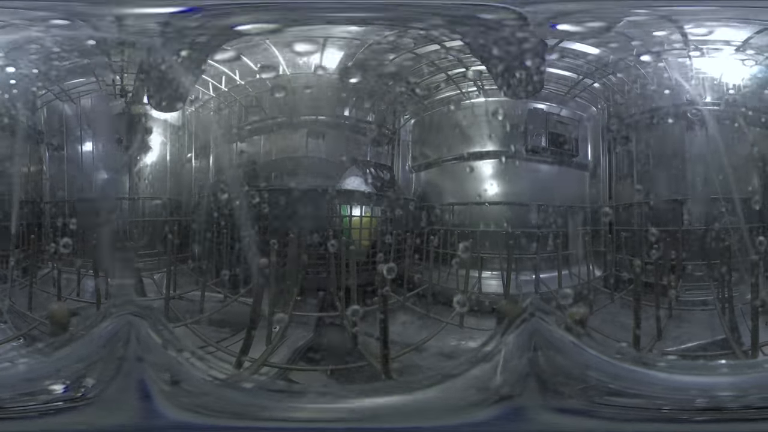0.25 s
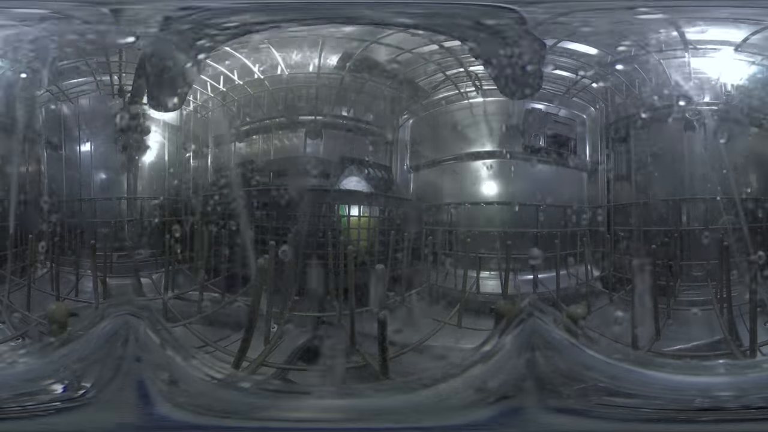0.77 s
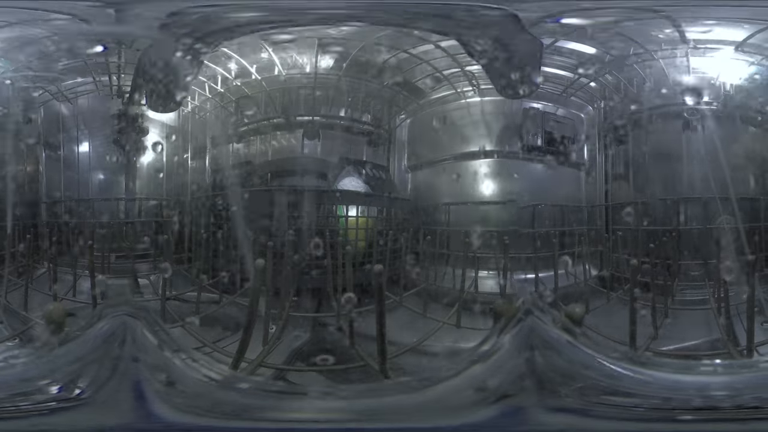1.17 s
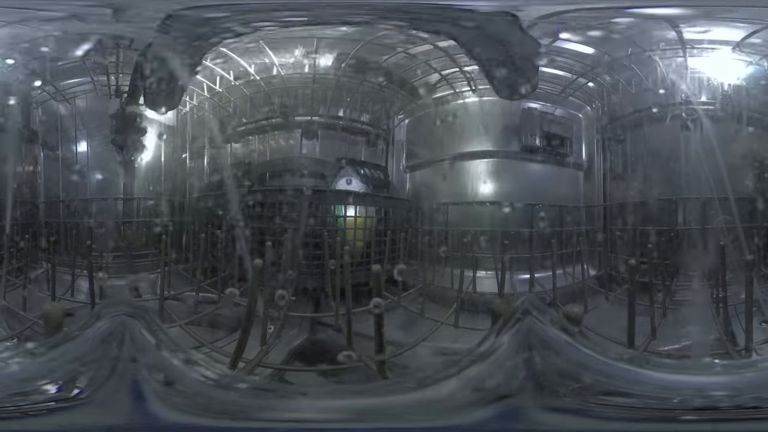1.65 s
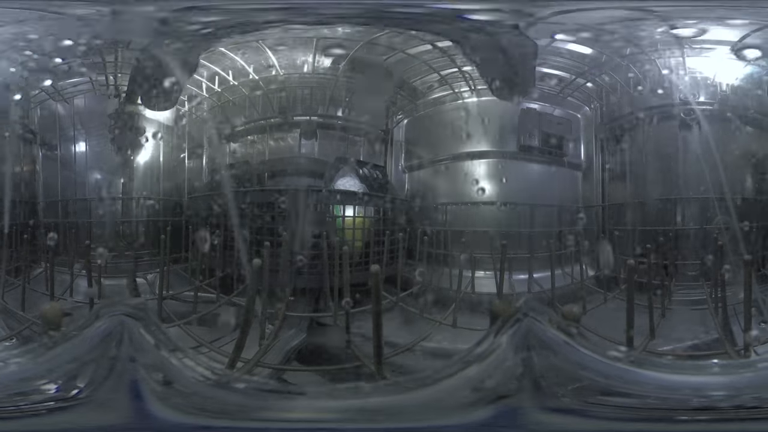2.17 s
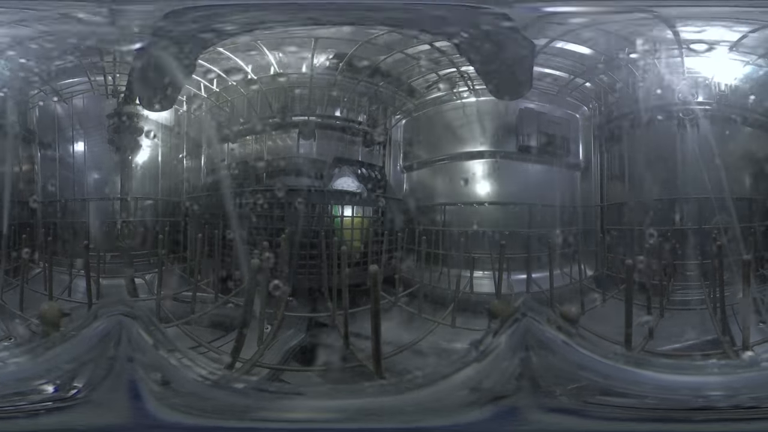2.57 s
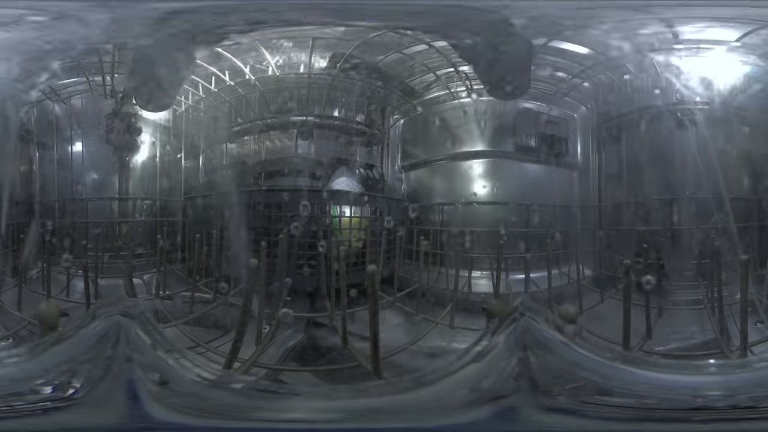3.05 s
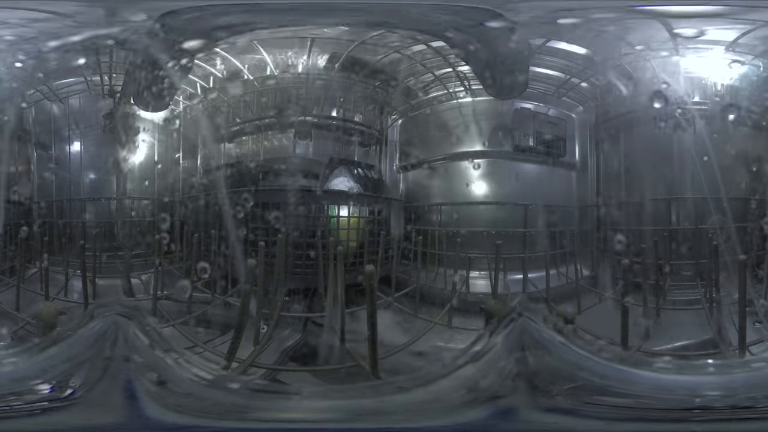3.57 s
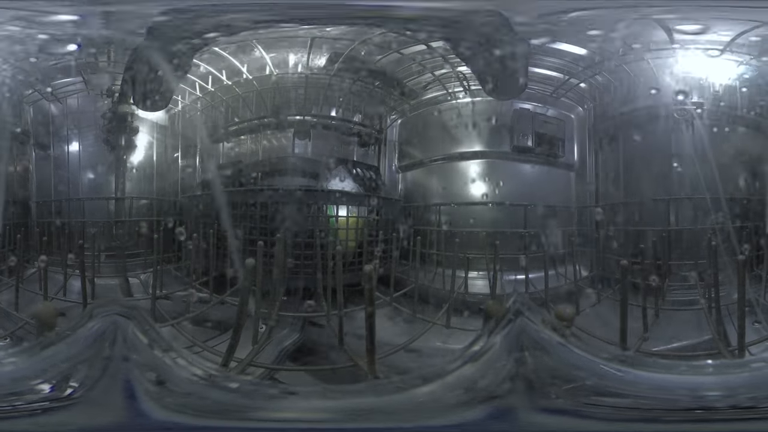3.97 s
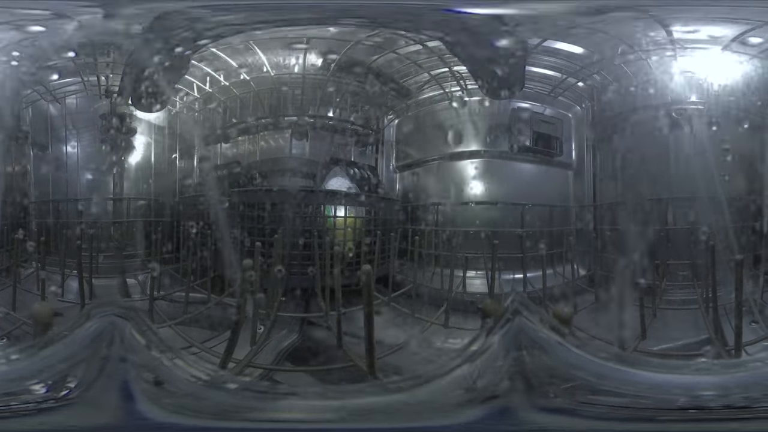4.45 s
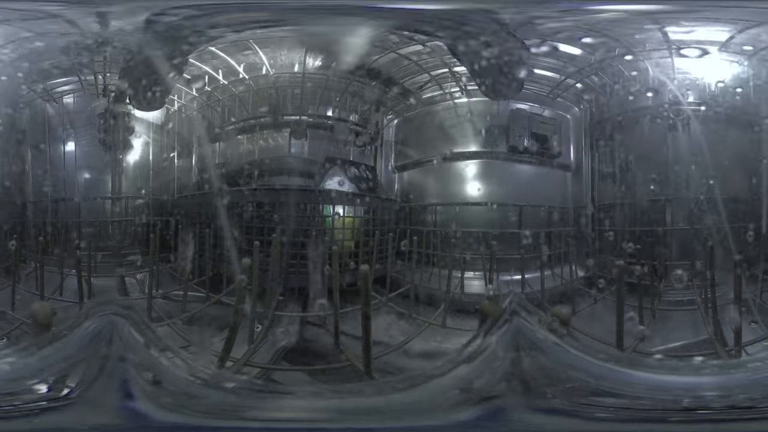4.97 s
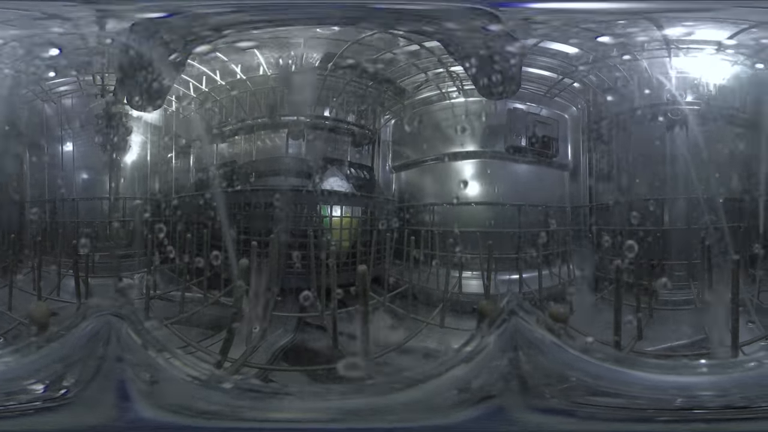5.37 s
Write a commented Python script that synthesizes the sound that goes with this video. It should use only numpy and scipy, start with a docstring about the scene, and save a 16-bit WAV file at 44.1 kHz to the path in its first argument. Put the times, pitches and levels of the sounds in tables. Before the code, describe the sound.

Water jets drum steadily on the steel tub and wire racks of a running dishwasher, heard from inside. The hollow wash comes in quick spurts, with slaps on the walls and brief ringing from the wires. Fine spray hisses and patters on the microphone's waterproof housing, and bigger drops strike it with sharp ticks, loudest about halfway and near the end. A pump hums faintly underneath.

```python
"""Water jets drumming on the steel tub and racks, heard from inside a running dishwasher.
Two spray arms sweep round: slugs of water slap the walls, rack wires sing, gushes break close by.
A fine spray patters on the microphone's waterproof housing, and now and then a big drop strikes it
with a sharp tick, the hardest ones clipping. A grainy mist hisses all around; the pump hums underneath."""
import sys
import numpy as np
from scipy import signal
from scipy.fft import rfft, irfft, next_fast_len
from scipy.io import wavfile

SR = 44100
rng = np.random.default_rng(int(sys.argv[2]) if len(sys.argv) > 2 else 0)


def transcribe(signal):
    """Save signal, clipped to [-1, 1], as a 16-bit WAV file at the path in sys.argv[1]."""
    frames = np.atleast_2d(signal).T
    limited = np.clip(frames, -1, 1)
    pcm = np.round(limited * 32767).astype(np.int16)
    wavfile.write(sys.argv[1], SR, pcm)


N = 247401
TIME = np.arange(N) / SR
FREQS = np.maximum(np.fft.rfftfreq(next_fast_len(N), 1 / SR), 1)
SIDES = np.array([[.5], [-.5]])   # half of a left-right difference goes to each ear
LOWER_TURN_S, CUTOFF_HZ = 1.153, 15900

# Resonances of tub, racks and trapped air. Each row: pitch in Hz, width in Hz, level in dB,
# left over right in dB, left phase lead in radians.
TUB_MODES = [(58, 41, -62, 4, 0.5), (245, 132, -46, -7.5, 2), (392.5, 57, -51, -6, 2.0),
             (481, 97, -42, -7.5, 2.5), (560.7, 32, -41.5, -6, 3.5), (584, 154, -35.5, -5, 3.0),
             (678, 230, -29, -5, 3.0), (823, 220, -27, -5.5, -3), (898.5, 31, -34.5, -7.5, -2.5),
             (990, 73, -37.5, -7, -1.5), (1065.5, 94, -33.5, -13, -2), (1110, 53, -32.5, -11, -1.33),
             (1179.3, 38, -40, -12.5, -0.8), (1265.5, 49, -42.5, -7.5, -0.5), (1276, 20.5, -43, -12.5, -2),
             (1313, 10.4, -46, -19.5, -3), (1433, 61, -46, -8.5, -1.5), (1523, 26, -49.5, -8, 2.5),
             (1564, 53, -51.5, -12.5, 2), (1671, 56, -48, -9, 1.5), (1812, 80, -48, 14, -2.6),
             (1939, 70, -40.5, 3.5, -2), (2026, 33, -43, 0.5, -3), (2467, 72, -45, -8, 1.05),
             (2677, 26, -47, 1, 0.8), (2716, 25, -41.5, -9, -1.5), (2743, 710, -39.5, -9, 0.16),
             (3140, 150, -49.5, -9, 1), (4084, 78, -38.5, -4.5, 3.5), (4373, 36, -41, 5, -1.5)]
# Force of the jets on the walls. Each row: time in seconds, relative level in dB.
JET_FORCE = [(0.0, -23.5), (0.15, -28.5), (0.53, -26), (0.76, -28.5), (1.06, -24.5), (1.26, -28.5),
             (1.32, -28), (1.42, -31), (1.48, -25.5), (1.64, -31), (1.84, -28), (2.01, -25), (2.11, -28),
             (2.3, -27.5), (2.39, -33.5), (2.47, -27.5), (2.58, -28.5), (2.69, -24), (2.87, -30.5),
             (3.04, -27.5), (3.15, -27), (3.43, -25.5), (3.55, -29.5), (3.72, -26), (4.0, -30), (4.08, -24),
             (4.22, -28.5), (4.38, -25.5), (4.5, -25.5), (4.62, -22.5), (4.75, -26.5), (4.86, -30.5),
             (5.15, -27), (5.38, -28.5), (5.6, -22.5)]
# Slugs of water slapping a wall. Each row: start in seconds, strength in dB.
WALL_SLAPS = [(0.049, 30), (0.09, 34), (0.225, 31), (0.305, 31), (0.689, 29), (1.042, 34.5), (1.248, 33),
              (1.483, 34), (1.595, 35), (1.767, 35.5), (1.913, 32.5), (2.0, 24), (2.78, 33.5), (3.265, 29),
              (3.336, 38), (3.777, 27), (3.876, 27), (4.362, 32), (4.396, 34), (4.438, 28), (4.524, 33),
              (4.594, 34.5), (4.663, 32), (5.081, 33), (5.485, 30), (5.516, 23)]
# The upper arm's jets crossing rack wires. Each row: peak time in seconds, level in dB, pitch in Hz.
WIRE_CROSSINGS = [(0.26, -30, 2730), (0.838, -26, 2695), (1.422, -21.5, 2730), (1.577, -28, 2730),
                  (1.716, -31, 2690), (1.753, -28, 2680), (2.467, -28.5, 2740), (2.736, -35, 2710),
                  (3.079, -26, 2720), (3.146, -24, 2714), (3.354, -32, 2700), (3.957, -29, 2740),
                  (4.053, -28.5, 2725), (4.631, -24, 2725), (4.962, -25.5, 2705), (5.215, -24.5, 2730),
                  (5.291, -28, 2750), (5.325, -30, 2750), (5.557, -29, 2730)]
# Gushes breaking on the racks. Each row: start in seconds, level in dB, centre in Hz, swell in seconds.
RACK_GUSHES = [(0.125, -40, 3200, 0.012), (1.597, -30, 3400, 0.0041), (1.755, -37, 2000, 0.0088),
               (2.552, -30, 3400, 0.0083), (3.23, -19, 4070, 0.0024), (4.505, -27.5, 1830, 0.0091)]
# Resonances of the housing. Each row: pitch in Hz, width in Hz, level in dB, left over right in dB,
# left phase lead in radians.
HOUSING_MODES = [(3690, 430, -38, -0.5, 4), (4440, 790, -37.5, -6.5, -0.7), (4903, 360, -32.5, -1, 0.41),
                 (5840, 1300, -55.5, 12, -7), (7275, 170, -43.5, -7, 1.6), (8420, 460, -47.5, -13, 3.5),
                 (9340, 300, -50, 11, -1), (11470, 900, -46, -9, 1.5), (13350, 820, -46, 15, 4),
                 (15700, 660, -46, 4, 5)]
# Spray reaching the housing. Each row: time in seconds, relative level in dB.
SPRAY_FORCE = [(0.0, -26), (1.58, -26.5), (1.83, -26.5), (2.06, -25.5), (3.77, -26.5), (3.95, -25),
               (4.14, -27.5), (4.36, -28), (4.55, -24.5), (5.47, -26), (5.61, -26.5)]
# Sheets of spray splattering over the housing. Each row: start in seconds, level in dB.
SPRAY_SHEETS = [(0.31, -42), (0.87, -33), (1.14, -26), (1.6, -25.5), (1.74, -28), (2.3, -25.5), (2.53, -31),
                (3.46, -25), (3.92, -30), (4.53, -33)]
# Big drops on the housing. Each row: start in seconds, ring level in dB, ring pitch in Hz,
# fizz against the ring in dB, splash level in dB, knock level in dB, left over right in dB.
BIG_DROPS = [(0.0921, -21, 14000, 4.5, -13.5, -23, -1), (0.2947, -25, 6720, 3, -26, -19, 0),
             (0.3585, -19.5, 7740, 8, -26, -26, 1), (0.7502, -22, 6740, 6, -16, -6, -3),
             (0.8812, -25, 6500, -4, -20, -20, 0), (0.9002, -8, 6750, 0, -13, -9, -6),
             (1.1895, -15, 14700, 9, -14, -12, 1.5), (1.2569, -14, 5500, 0, -24, -15, -5),
             (1.3349, -22, 7500, 3, -26, -30, -4), (1.4948, -18, 6900, -4, -27, -32, -13),
             (1.5962, -19, 2950, 0, -14, -8.5, 0), (1.6162, -28, 6900, 2, -14, -25, 0),
             (1.8776, -24, 9300, 7, -19, -26, 1), (2.5486, -24, 7010, 4, -19, -21, 0),
             (2.9934, 1.5, 5070, -2, -16, 0, -8), (3.4516, -23, 11800, 5, -23, -30, -2),
             (3.7967, -12, 15200, 3, -14.5, -15, 2), (3.9407, -31, 8000, 2, -22, -30, 0),
             (4.3295, -16, 12940, 6.5, -19, -27, -4), (4.4745, -25, 7500, 4, -24, -14, -2),
             (4.7107, -3.5, 6800, 3, -9, -4.5, -2), (5.1602, -21, 8400, 3, -20, -17, -2),
             (5.2592, -19, 8350, 7, -14, -13, -3), (5.2631, 4, 4880, -9, -19, -14, -4),
             (5.4851, -12, 11100, 1, -21, -31, 5.5)]
# What a drop's knock rings in the housing. Each row: pitch in Hz, relative level in dB.
KNOCK_MODES = [(1920, -18), (2920, -9.5), (4050, -23), (5000, -1.5), (7000, -8.5), (8150, -14)]
# Two faint low thumps. Each row: start in seconds, level in dB, pitch in Hz.
LOW_THUMPS = [(3.795, -43, 55), (5.25, -41, 160)]
# Tone of the spray landing all around. Each row: frequency in Hz, left and right level in dB per Hz.
MIST_SPECTRUM = [(25, -90.1, -95), (60, -90, -77), (184, -71, -77.5), (344, -77, -75.5), (714, -68, -59),
                 (1220, -67, -57.5), (1510, -77, -65.5), (2340, -66, -68), (3740, -77.5, -67.5),
                 (4500, -69.5, -73), (6770, -69.5, -66), (9700, -73, -78), (12600, -73.5, -71),
                 (15600, -71, -73.5)]
# Tones of the pump. Each row: pitch in Hz, left level in dB, right level in dB.
PUMP_TONES = [(119.8, -56, -60), (230.4, -62, -53)]


def tub(wall_db, spray_db, wall_range_hz=(950, 1750)):
    """Wall panels follow their own jets and take the slaps; the other resonances feel the general wash."""
    wash_db = 0.37 * wall_db + 0.17 * spray_db + 1.45 * drift(12)
    slaps = np.zeros(N)
    for s, strength_db in WALL_SLAPS:
        slaps[round(s * SR)] = from_db(strength_db)
    out = np.zeros((2, N))
    for hz, *shape in TUB_MODES:
        water = patter(per_s=700, spread_db=3, grain_share=0.4)
        is_wall = wall_range_hz[0] < hz < wall_range_hz[1]
        drive = water * from_db(wall_db) + slaps if is_wall else water * from_db(wash_db)
        out += resonate(drive, hz, *shape)
    return out


def rack(crossing_s=0.018, wander_hz=30, flutter_db=1.0, tone_db=-2.0, pan_db=-8.0):
    """A passing jet makes a rack wire sing; the water shakes its pitch and rasps on the wires beside it."""
    shake = np.cumsum(wander_hz * drift(100)) / SR
    tone, force = np.zeros((2, N))
    for s, level_db, hz in WIRE_CROSSINGS:
        near = np.abs(TIME - s) < .1
        t = TIME[near] - s
        crossing = from_db(level_db) * np.exp(-(t / crossing_s) ** 2)
        force[near] += crossing
        tone[near] += crossing * np.sin(2 * np.pi * (hz * t + shake[near]))
    water = patter(per_s=600, spread_db=2.5, grain_share=0.58) * force
    rasp = resonate(water, hz=2745, width_hz=210, level_db=-7, pan_db=pan_db, lead_rad=0)
    return tone * from_db(tone_db + flutter_db * drift(150) + pan_db * SIDES) + rasp


def gushes():
    """Water breaks on the racks close by: a short, dense spatter in a broad band."""
    out = np.zeros((2, N))
    for s, level_db, hz, swell_s in RACK_GUSHES:
        spatter = patter(per_s=2100, spread_db=2, grain_share=0.23) * swells([(s, level_db)], swell_s)
        out += resonate(spatter, hz, width_hz=0.75 * hz, level_db=0, pan_db=-2, lead_rad=0.74)
    return out


def housing(spray_db):
    """Droplets on the housing set its short, bright resonances ringing."""
    force = from_db(spray_db)
    return sum(resonate(patter(per_s=1100, spread_db=3, grain_share=0.4) * force, *mode)
               for mode in HOUSING_MODES)


def splatter(swell_s=0.017, low_hz=5500, band_count=5):
    """Each sheet of spray is a short shower of separate droplets, scattered over the treble bands."""
    edges = np.geomspace(low_hz, CUTOFF_HZ, band_count + 1)
    shower = np.zeros((2, N))
    for band in zip(edges, edges[1:]):
        droplets = np.array([patter(per_s=370, spread_db=3, grain_share=0.66) for ear in SIDES])
        shower += signal.sosfilt(signal.butter(2, band, "band", fs=SR, output="sos"), droplets)
    return shower * swells(SPRAY_SHEETS, swell_s)


def drops(rows, ring_s=0.00059, splash_s=0.00087, knock_s=0.00055, splash_low_hz=4400, uneven_db=1.0):
    """A drop rings and fizzes at its own pitch, bursts in a bright splash and knocks the housing."""
    out = np.zeros((2, N))
    lag_s = np.array([[0], [0.0004]])   # the tick reaches the right ear later
    t = np.maximum(TIME[:SR // 50] - lag_s, 0)
    low_cut = signal.butter(1, splash_low_hz, "high", fs=SR, output="sos")
    for s, ring_db, hz, fizz_db, splash_db, knock_db, pan_db in rows:
        burst = rng.standard_normal(t.shape) * swell(t, splash_s)
        fizz_band = signal.butter(2, [hz * .85, hz * 1.15], "band", fs=SR, output="sos")
        fizz = from_db(fizz_db) * signal.sosfilt(fizz_band, burst)
        ring = from_db(ring_db) * (ping(t, hz, ring_s) + fizz)
        splash = from_db(splash_db) * signal.sosfilt(low_cut, burst)
        knock = sum(from_db(knock_db + mode_db + uneven_db * rng.standard_normal())
                    * ping(t, mode_hz, knock_s) for mode_hz, mode_db in KNOCK_MODES)
        add(out, s, (ring + splash + knock) * from_db(pan_db * SIDES))
    return out


def small_drops(count=120, centre_hz=8600, ring_db=-30, fizz_db=4, splash_db=-32, knock_db=-30):
    """Smaller drops tick on the housing at random times, high-pitched and on either side."""
    when, pitch, size, side = rng.uniform(-1, 1, (count, 4)).T
    size_db, pan_db = 2 * size, 7 * side
    s = (when + 1) / 2 * TIME[-1]
    hz = np.minimum(centre_hz * 1.7 ** pitch, CUTOFF_HZ)
    return drops(np.column_stack([s, ring_db + size_db, hz, np.full(count, fizz_db),
                                  splash_db + size_db, knock_db + size_db, pan_db]))


def thumps(swell_s=0.0069):
    """Two faint low thumps, each just before a loud tick."""
    t = TIME[:SR // 10]
    out = np.zeros(N)
    for s, level_db, hz in LOW_THUMPS:
        add(out, s, from_db(level_db) * ping(t, hz, swell_s))
    return out


def mist(spray_db):
    """Far droplets blend into a grainy hiss, different in each ear."""
    hz, *ears_db = np.transpose(MIST_SPECTRUM)
    density = np.array([from_db(np.interp(np.log(FREQS), np.log(hz), ear)) for ear in ears_db])
    droplets = np.array([patter(per_s=700, spread_db=2, grain_share=0.22) for ear in ears_db])
    rumble_cut = FREQS / np.hypot(FREQS, 10)
    return colour(droplets * from_db(0.61 * spray_db), density * np.sqrt(SR / 2) * rumble_cut)


def pump(waver_hz=4.76, throb_db=3.0):
    """The pump's low hum wavers and throbs with the load of the water."""
    out = np.zeros((2, N))
    for hz, left_db, right_db in PUMP_TONES:
        phase = 2 * np.pi * np.cumsum(hz + waver_hz * drift(13.6)) / SR
        level_db = throb_db * drift(11) + np.array([[left_db], [right_db]])
        out += np.sqrt(2) * np.sin(phase) * from_db(level_db)
    return out


def patter(per_s, spread_db, grain_share):
    """Countless tiny impacts merge into noise; larger ones stand out as clicks. Unit power."""
    landed = np.flatnonzero(rng.random(N) < per_s / SR)
    noise = rng.standard_normal(N)
    size_db = spread_db * np.minimum(rng.exponential(1, N)[landed], np.pi)
    clicks = np.zeros(N)
    clicks[landed] = np.sign(noise[landed - 1]) * from_db(size_db)
    return np.sqrt(grain_share) * clicks / clicks.std() + np.sqrt(1 - grain_share) * noise


def resonate(drive, hz, width_hz, level_db, pan_db, lead_rad):
    """A steep-sided resonance; its standing wave meets each ear at its own level and phase."""
    response = 1 / (1 + 1j * (FREQS ** 2 - hz ** 2) / (FREQS * width_hz)) ** 2
    response /= np.sqrt(np.mean(np.abs(response) ** 2))
    return colour(drive, response * from_db(level_db + pan_db * SIDES) * np.exp(1j * lead_rad * SIDES))


def colour(x, response):
    """Pass a sound through a frequency response."""
    size = next_fast_len(N)
    return irfft(rfft(x, size) * response, size)[..., :N]


def ping(t, hz, swell_s):
    """A tone that swells and dies away."""
    return swell(t, swell_s) * np.sin(2 * np.pi * hz * t)


def swell(t, swell_s):
    """An envelope that rises to 1 in swell_s and dies away."""
    return t / swell_s * np.exp(1 - t / swell_s)


def swells(rows, swell_s):
    """A run of swells. Each row: start in seconds, peak in dB."""
    return sum(from_db(peak_db) * swell(np.maximum(TIME - s, 0), swell_s) for s, peak_db in rows)


def sweep(peak_s, per_turn):
    """The even rise and fall, between -1 and 1, as the lower arm turns."""
    return np.cos(2 * np.pi * per_turn * (TIME - peak_s) / LOWER_TURN_S)


def drift(per_s):
    """A smooth random wander of spread 1 that changes about per_s times a second."""
    slow = irfft(rfft(rng.standard_normal(next_fast_len(N))) / (1 + 1j * FREQS / per_s) ** 2)[:N]
    return slow / slow.std()


def swing_db(rows):
    """A level curve at every sample, in dB about its mean power."""
    level = np.interp(TIME, *np.transpose(rows))
    return level - 10 * np.log10(np.mean(from_db(level) ** 2))


def from_db(db):
    """Decibels to gain."""
    return 10 ** (np.asarray(db) / 20)


def add(out, s, sound):
    """Mix a short sound in at s seconds."""
    start = round(s * SR)
    out[..., start:start + sound.shape[-1]] += sound[..., :N - start]


def scene():
    """Jets and spray swell with each pass of the arm and come in quick spurts, over the pump's hum."""
    # The lower arm's two blades pass the near wall twice a turn and throw spray four times a turn.
    wall_db = 0.86 * swing_db(JET_FORCE) + 0.2 * sweep(peak_s=0.33, per_turn=2) + 0.28 * drift(24)
    spray_db = 0.87 * swing_db(SPRAY_FORCE) + 0.68 * sweep(peak_s=0.026, per_turn=4) + 1.52 * drift(17.3)
    washing = tub(wall_db, spray_db) + rack() + gushes()
    spray = housing(spray_db) + mist(spray_db) + splatter()
    ticks = drops(BIG_DROPS) + small_drops() + thumps()
    return washing + spray + ticks + pump()


def record(dry):
    """The hardest ticks overload and clip; a steep low-pass takes off the very top."""
    clipped = np.clip(dry, -.95, .95)
    return signal.sosfilt(signal.ellip(12, .1, 85, CUTOFF_HZ, fs=SR, output="sos"), clipped)


dry = scene()
out = record(dry)
transcribe(out)
```